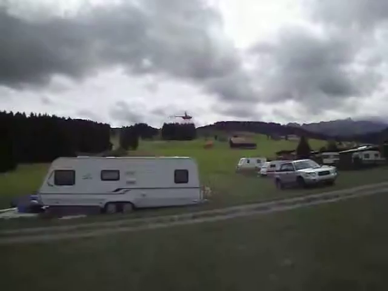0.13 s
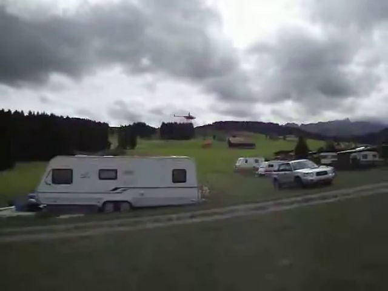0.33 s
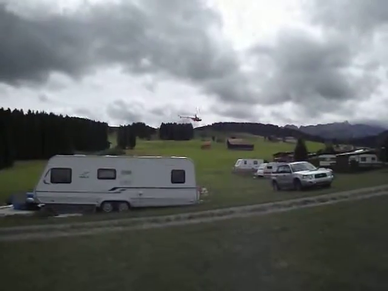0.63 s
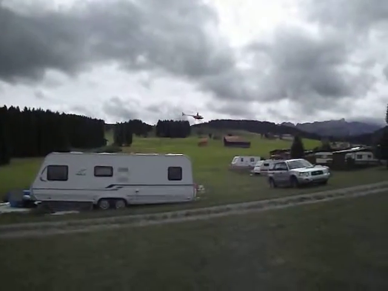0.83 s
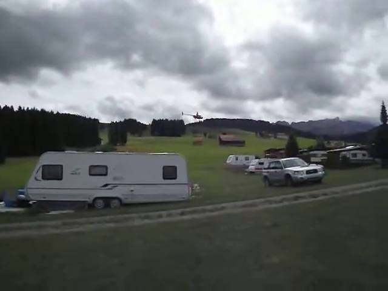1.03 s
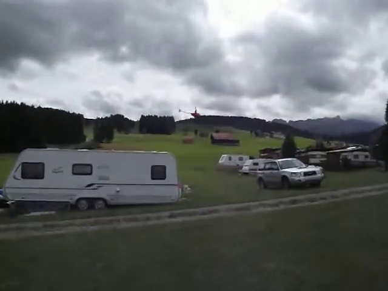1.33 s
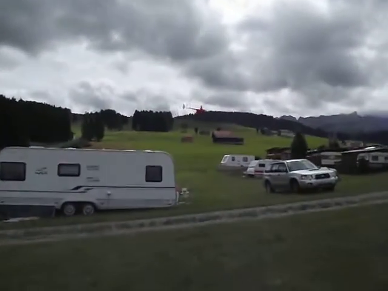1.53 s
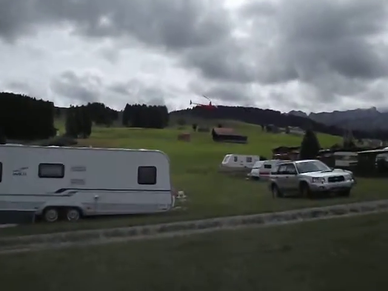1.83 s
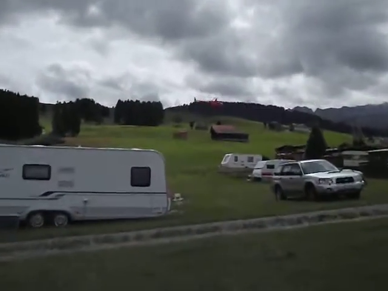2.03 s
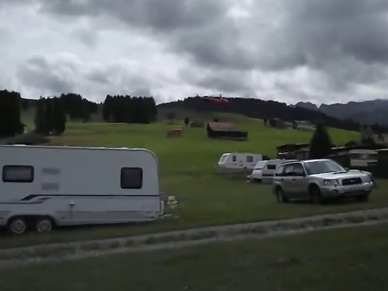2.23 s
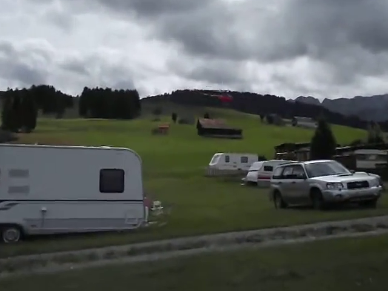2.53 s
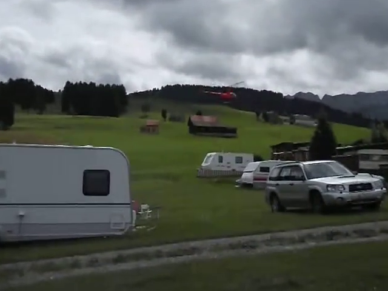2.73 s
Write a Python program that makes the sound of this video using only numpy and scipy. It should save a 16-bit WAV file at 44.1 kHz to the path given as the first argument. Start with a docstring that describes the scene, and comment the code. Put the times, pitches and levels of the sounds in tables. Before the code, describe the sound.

A helicopter chops and drones steadily at a distance outdoors, the thumps strengthening about halfway through. Near the small microphone, light wind rustles and a few clicks and dull bumps occur, mostly early, with sharp cracks scattered throughout.

```python
"""The thump and chopped rush of a piston helicopter, flying low over an alpine meadow some way off.
Each main rotor blade sends out a pressure pulse and modulates the noise of the turbulent air;
tail rotor and exhaust drone in harmonic series geared to the same shaft. Close by, a few small
ticks, bumps and cracks sound, and light wind rumbles on the small camera microphone that hears it all."""
import sys
import numpy as np
from scipy import signal
from scipy.fft import rfft, irfft, next_fast_len
from scipy.io import wavfile
from scipy.ndimage import uniform_filter1d, map_coordinates

SR = 44100
rng = np.random.default_rng(int(sys.argv[2]) if len(sys.argv) > 2 else 0)


def dump_mix(stems):
    """Bounce the given channels to the path in sys.argv[1] as a 16-bit WAV at rate SR."""
    frames = np.atleast_2d(stems).T  # one column per channel
    limited = np.clip(frames, -1, 1)  # hard clip at full scale
    pcm = np.round(limited * 32767).astype(np.int16)
    wavfile.write(sys.argv[1], SR, pcm)


N = 127449
T = np.arange(N) / SR
FIRINGS_PER_BLADE, FIRINGS_PER_TAIL_BLADE, FIRINGS_PER_TURN = 10.02, 1.675, 3


# Pressure lobes of one blade passage. Each row: delay in seconds, width in seconds, relative height.
THUMP_LOBES = [(-.0035, .0042, .2), (.0005, .0024, .2), (.0185, .003, -.19), (.026, .003, -.11)]
# Strength of the thumps. Each row: time in seconds, gain in dB.
THUMP_LEVEL = [(0, -2), (.45, -2), (.6, -5), (1.2, -3), (1.6, 1.5), (2.1, 2), (2.89, 1.5)]
def main_rotor():
    """Impulsive blade noise: each passing blade sends a compression followed by a rarefaction."""
    thumps = each_blade(THUMP_LOBES, scatter_db=1.43)
    return (thumps - thumps.mean()) * amp(curve(THUMP_LEVEL))


# Swells of rushing air in one blade passage. Each row: delay in seconds, width in seconds, gain in dB.
SWISH_LOBES = [(-.015, .004, 2.5), (-.001, 0.0012, 5), (.016, 0.0058, 4)]
# Spectra of the low roar and the ringing treble rush. Each row: frequency in Hz, relative density in dB.
ROAR_SPECTRUM = [(60, -16.5), (130, 4.5), (220, 4.5), (290, 0.5), (370, -3.5), (500, -1), (750, 2),
                 (1000, -9.5), (1250, -8), (1500, -3), (2000, -23.5), (3500, -21.5), (5000, -36.5),
                 (6000, -53.5)]
RUSH_SPECTRUM = [(300, -48), (800, -18.5), (1150, -14.5), (1500, -14), (2050, -9), (2350, -5), (2650, -0.5),
                 (2870, 1.5), (3060, -2), (3280, -14), (3600, -14), (4000, -15), (4500, -25.5), (5000, -33),
                 (5600, -46.5)]
# Their loudness. Each row: time in seconds, level in dB.
ROAR_LEVEL = [(.08, -28), (.85, -31.5), (1.35, -34), (1.7, -26.5), (1.95, -29.5), (2.1, -27.5),
              (2.19, -34.5), (2.3, -28.5), (2.43, -33.5), (2.56, -30.5), (2.68, -27), (2.89, -27.5)]
RUSH_LEVEL = [(.08, -25), (.21, -23.5), (.26, -27), (.42, -19), (.52, -22.5), (.85, -22.5), (1.0, -23.5),
              (1.25, -20), (1.5, -19.5), (1.62, -23), (1.8, -19.5), (1.97, -23.5), (2.13, -20.5),
              (2.19, -23), (2.31, -18), (2.41, -22.5), (2.56, -24.5), (2.69, -18.5), (2.89, -21.5)]
def blade_turbulence():
    """Amplitude modulation: both rotors and the exhaust chop the broadband noise of turbulent air."""
    count = firings()
    chop_db = each_blade(SWISH_LOBES, scatter_db=2.67)
    chop_db += 1.23 * wobble(45) + 1.47 * wobble(400)  # flutter and finer grain
    chop_db += .47 * np.cos(2 * np.pi * count / FIRINGS_PER_TAIL_BLADE)
    chop_db += np.cos(2 * np.pi * count)  # 1 dB either way at each firing
    roar = coloured(amp(chop_db) * fading_noise(), ROAR_SPECTRUM)
    rush = coloured(amp(chop_db) * fading_noise(), RUSH_SPECTRUM)
    return roar * amp(curve(ROAR_LEVEL)) + rush * amp(curve(RUSH_LEVEL))


# Exhaust harmonics. Each row: multiple of the crank rate, relative level in dB.
EXHAUST_HARMONICS = [(3, -31), (5, -49.5), (6, -39), (7, -47), (9, -45.5), (10, -41.5), (11, -54),
                     (12, -56)]
# Strength of the exhaust drone. Each row: time in seconds, gain in dB.
EXHAUST_LEVEL = [(.1, -10.5), (.25, -1.5), (.35, 1.5), (.85, 1), (.97, -8), (1.25, -1.5), (1.9, 0.5),
                 (2.2, 0.5), (2.85, 4)]
def exhaust():
    """Periodic firing repeats with each turn of the crank, so it radiates harmonics of the crank rate."""
    return drone(firings() / FIRINGS_PER_TURN, EXHAUST_HARMONICS, drift=.16) * amp(curve(EXHAUST_LEVEL))


# Tail rotor harmonics. Each row: multiple of its blade rate, relative level in dB.
TAIL_HARMONICS = [(1, -32), (2, -40), (3, -45), (4, -46.5), (5, -41), (6, -43), (7, -48), (8, -48.5)]
def tail_rotor():
    """Rotational noise: the blades pass fast enough for their pulses to fuse into a pitch."""
    return drone(firings() / FIRINGS_PER_TAIL_BLADE, TAIL_HARMONICS, drift=.59)


# Brightness of both drones. Each row: time in seconds, spectral tilt in dB per octave.
DRONE_TILT = [(0, 0.5), (1.1, 2), (1.7, -0.1), (2.2, -2.5), (2.89, -1.5)]
def drone(cycles, harmonics, drift, fade_db=1.5, pivot_hz=135):
    """Atmospheric scintillation: each harmonic fades and drifts in phase; the high ones drift most."""
    fundamental_hz = (cycles[-1] - cycles[0]) / T[-1]
    tilt = curve(DRONE_TILT)
    out = np.zeros(N)
    for k, db in harmonics:
        pivot_ratio = k * fundamental_hz / pivot_hz
        level_db = db + tilt * np.log2(pivot_ratio) + fade_db * wobble(5)
        waver = drift * np.sqrt(pivot_ratio) * wobble(7)
        phase = 2 * np.pi * k * cycles + rng.uniform(0, 2 * np.pi) + waver
        out += np.sqrt(2) * amp(level_db) * np.cos(phase)
    return out


# Engine firing rate at the listener. Each row: time in seconds, rate in Hz.
FIRING_RATE = [(0, 136.7), (.85, 136.6), (1.05, 135.6), (1.45, 135.7), (1.7, 135.0), (2.89, 134.9)]
def firings(blade_at_s=2.502):
    """Count of firings from one blade passage; the Doppler shift shrinks as the approach slows."""
    count = np.cumsum(curve(FIRING_RATE)) / SR
    return count - np.interp(blade_at_s, T, count)


# Sharp cracks. Each row: start in seconds, level in dB, pitch in Hz.
CRACKS = [(0.222, -8.5, 2740), (0.427, -12, 2720), (0.488, -9, 2860), (.62, -12, 2870), (0.632, -11, 2720),
          (.887, -6.5, 2790), (0.956, -7.5, 2760), (1.035, -8.5, 2830), (1.375, -13, 2844), (1.7, -9, 2860),
          (2.14, -8, 2760), (2.295, -5, 2820), (2.669, -9, 2780), (2.738, -7, 2930)]
def cracks(attack_s=.0013, edge_db=-6.5):
    """Damped oscillation: a brief noisy edge, then a short ring near the spectral peak of the rush."""
    edge_spectrum = [(600, -6.5), (2900, -1), (4000, -7.5), (4700, -22), (5600, -39.5)]
    noise = coloured(rng.standard_normal(N), edge_spectrum)
    out = np.zeros(N)
    for start, db, hz in CRACKS:
        ring = burst(start, attack_s, t60=.038) * np.sin(2 * np.pi * hz * (T - start))
        edge = amp(edge_db) * burst(start, attack_s, t60=.02) * noise
        out += amp(db) * (ring + edge)
    return out


# Hollow ticks and dull bumps. Each row: start in seconds, level in dB, centre frequency in Hz.
TICKS = [(.551, -9.5, 1410), (.634, -11, 1500), (.886, -19.5, 1620), (.967, -16, 1480), (1.006, -14, 1560)]
BUMPS = [(.172, -13, 405), (.356, -16.5, 420), (.576, -12.5, 468), (.739, -10, 435), (1.904, -12, 496),
         (1.977, -20, 600)]
def knocks(rows, half_width_hz, attack_s, t60):
    """Heavy damping: each small knock nearby is a short burst of noise in one broad resonance."""
    out = np.zeros(N)
    for start, db, centre in rows:
        band = filtered(rng.standard_normal(N), lambda hz: 1 / (1 + ((hz - centre) / half_width_hz) ** 4))
        out += amp(db) * burst(start, attack_s, t60) * unit(band)
    return out


def snap(start=.6335, db=-10):
    """A brief contact has a wide spectrum: the bright edge of the tick at 0.63 s."""
    noise = coloured(rng.standard_normal(N), [(1000, -18.5), (3500, 3), (5200, -28), (7000, -14)])
    return amp(db) * burst(start, attack_s=.00015, t60=.012) * noise


# Spectra of the wind's rumble and rustle. Each row: frequency in Hz, relative density in dB.
RUMBLE_SPECTRUM = [(10, -5), (25, -3.5), (55, 0.5), (105, -13.5), (200, -15.5), (500, -54.5)]
RUSTLE_SPECTRUM = [(60, -4.5), (130, 7.5), (230, -16), (330, 1), (450, 4), (650, -5), (1000, -5),
                   (1250, -14), (1500, -8.5), (2000, -16.5), (3500, -9), (4500, -25), (5600, -58)]
# Their loudness. Each row: time in seconds, level in dB.
RUMBLE_LEVEL = [(0, -25), (.3, -24), (.58, -30.5), (.66, -28.5), (.725, -18.5), (.8, -25), (.95, -33.5),
                (1.35, -37.5), (1.65, -26), (2.1, -28.5), (2.4, -33.5), (2.65, -27.5), (2.89, -32)]
RUSTLE_LEVEL = [(.08, -28.5), (.19, -24), (.25, -30), (.35, -25), (.5, -27), (.58, -24), (.68, -32.5),
                (.735, -18.5), (.77, -29), (.82, -21), (.88, -21.5), (.93, -28.5), (1.1, -34),
                (1.65, -36.5), (2.1, -41), (2.3, -55), (2.89, -46)]
def wind():
    """Turbulent pressure on the microphone: a rumble, and a fluttering rustle in the gusts."""
    flutter = amp(1.7 * wobble(60) + wobble(300))
    rustle = coloured(flutter * rng.standard_normal(N), RUSTLE_SPECTRUM)
    rumble = coloured(rng.standard_normal(N), RUMBLE_SPECTRUM)
    return rumble * amp(curve(RUMBLE_LEVEL)) + rustle * amp(curve(RUSTLE_LEVEL))


def each_blade(lobes, scatter_db):
    """A pulse train: Gaussian lobes recur at every main blade passage, each of a slightly different size."""
    blades = firings() / FIRINGS_PER_BLADE
    passages = np.interp(np.arange(np.ceil(blades[0]), blades[-1]), blades, T)
    sizes = amp(scatter_db * rng.standard_normal((len(passages), len(lobes))))
    out = np.zeros(N)
    for passage, row in zip(passages, sizes):
        near = abs(T - passage) < .1
        for size, (delay, width, height) in zip(row, lobes):
            out[near] += size * height * np.exp(-.5 * ((T[near] - passage - delay) / width) ** 2)
    return out


def fading_noise(depth_db=1.5):
    """Selective fading: white noise with drifting patches of gain, as after a long path in moving air."""
    spectrogram = signal.stft(rng.standard_normal(N), nperseg=1024)[2]
    patches = uniform_filter1d(rng.standard_normal(spectrogram.shape), size=6, axis=0)  # across frequency
    patches = uniform_filter1d(patches, size=8, axis=1)  # across time
    return unit(signal.istft(spectrogram * amp(depth_db * unit(patches)))[1][:N])


def burst(start, attack_s, t60):
    """Exponential decay: a blow's envelope rises quickly, then falls 60 dB in t60 seconds."""
    age = np.maximum(T - start, 0)
    return (1 - np.exp(-age / attack_s)) * amp(-60 * age / t60)


def coloured(x, points):
    """Spectral shaping by (Hz, dB) points, scaled to rms 1."""
    knots_hz, db = np.transpose(points)
    return unit(filtered(x, lambda hz: amp(np.interp(np.log(hz + 1), np.log(knots_hz + 1), db))))


def filtered(x, response):
    """Linear filtering: the spectrum of x times a frequency response."""
    size = next_fast_len(N + SR // 2)
    return irfft(rfft(x, size) * response(np.fft.rfftfreq(size, 1 / SR)), size)[:N]


def wobble(rate):
    """A smooth random curve, rate knots a second."""
    return map_coordinates(rng.standard_normal(int(N * rate / SR) + 4), [T * rate])


def curve(rows):
    """Linear interpolation of (seconds, value) rows at every sample."""
    return np.interp(T, *np.transpose(rows))


def amp(db):
    """Decibels to gain."""
    return 10 ** (np.asarray(db) / 20)


def unit(x):
    """Scale to rms 1."""
    return x / np.sqrt(np.mean(x ** 2) + 1e-20)


def scene():
    """Superposition: the helicopter, the small noises nearby and the wind add in one channel."""
    drones = exhaust() + tail_rotor()
    ticks = knocks(TICKS, half_width_hz=140, attack_s=.00059, t60=.035)
    bumps = knocks(BUMPS, half_width_hz=240, attack_s=.0006, t60=.05)
    nearby = ticks + bumps + snap()
    helicopter = main_rotor() + blade_turbulence() + drones
    return (helicopter + cracks() + nearby + wind())[None]


def record(dry):
    """Saturation and band limiting: the camera starts a moment in, rounds peaks and cuts high treble."""
    start_s, ceiling, cutoff_hz = .0725, .85, 5800
    x = dry[0] * np.clip((T - start_s) / .003, 0, 1)
    x = x / (1 + abs(x / ceiling) ** 8) ** (1 / 8)
    return filtered(x, lambda hz: 1 / (1 + (hz / cutoff_hz) ** 40))[None]


dry = scene()
out = record(dry)
dump_mix(out)
```